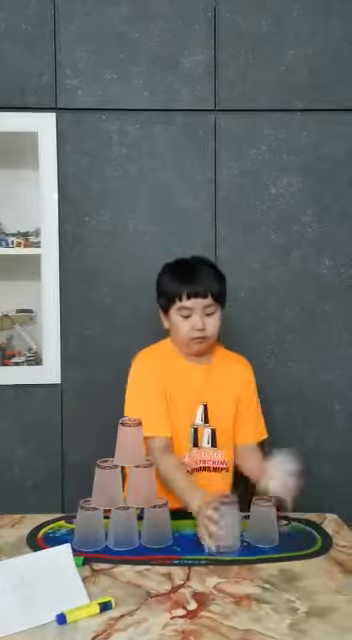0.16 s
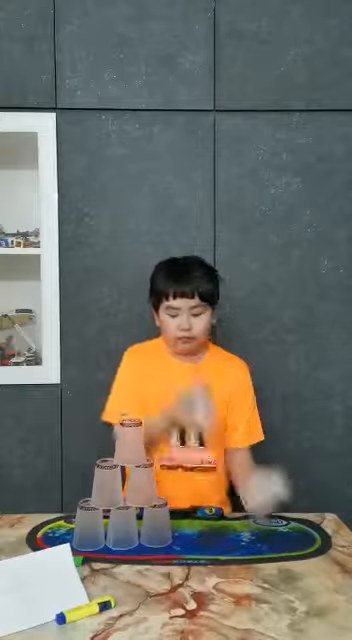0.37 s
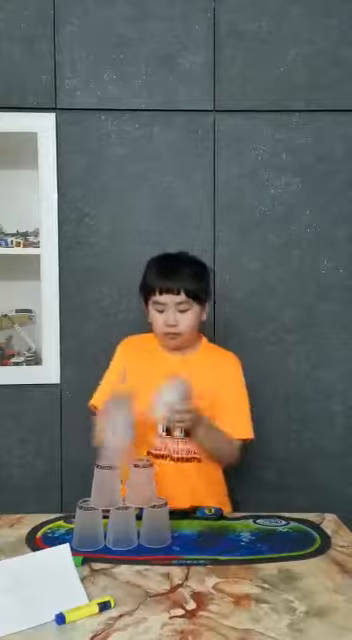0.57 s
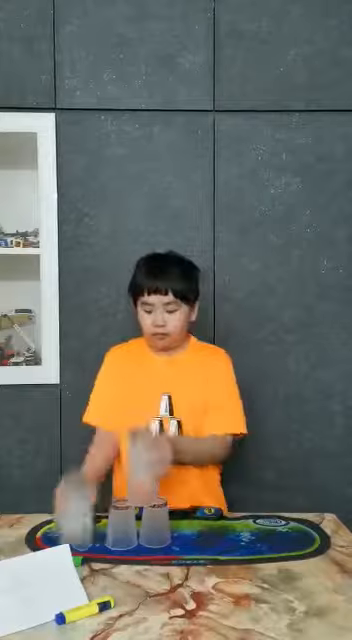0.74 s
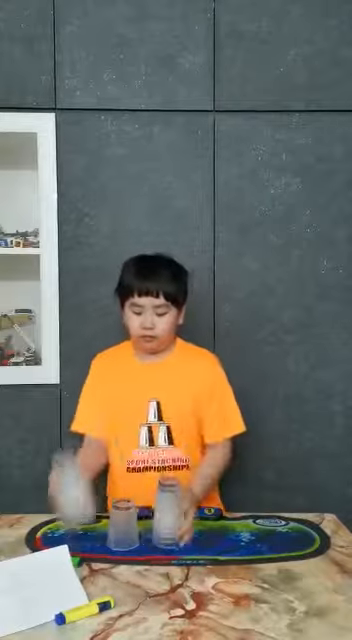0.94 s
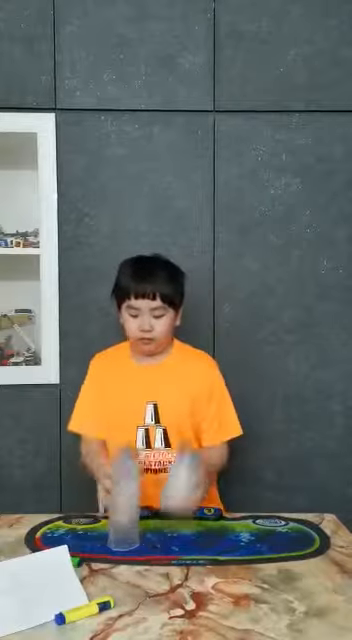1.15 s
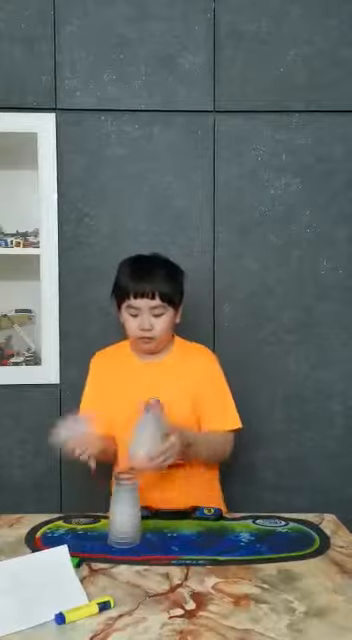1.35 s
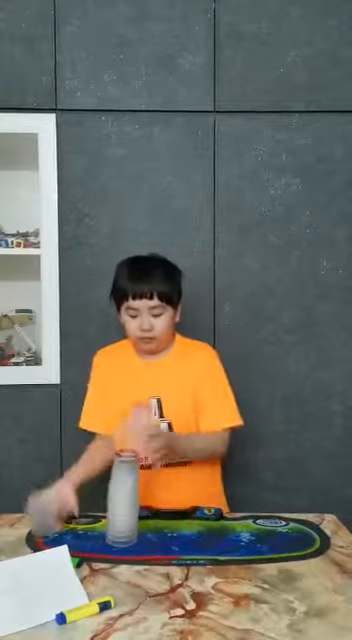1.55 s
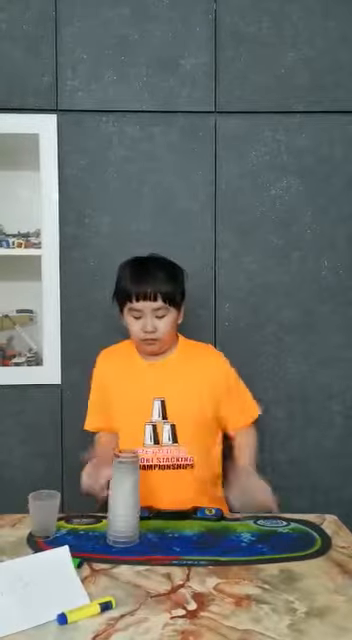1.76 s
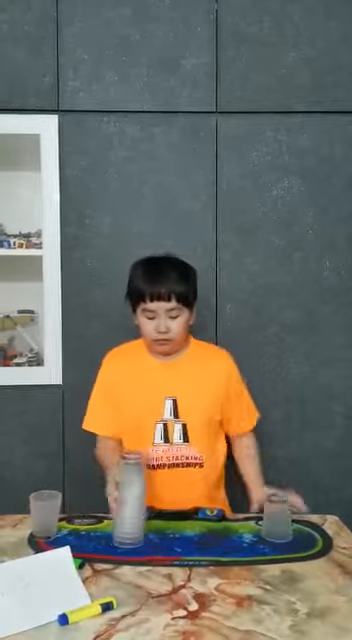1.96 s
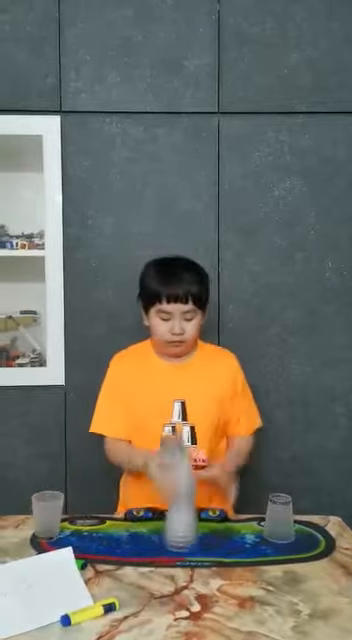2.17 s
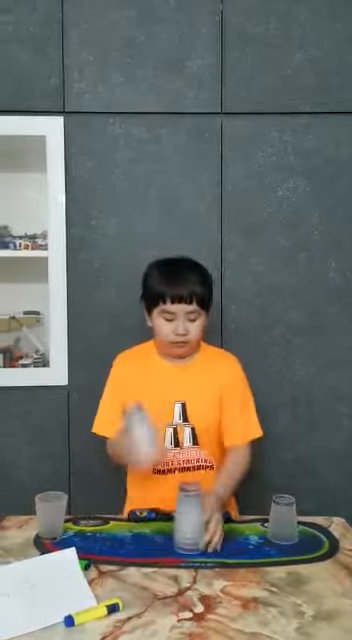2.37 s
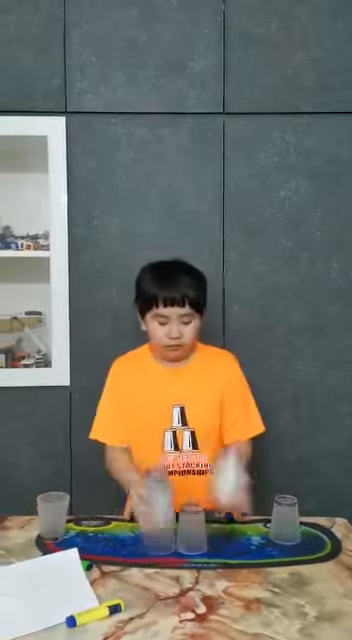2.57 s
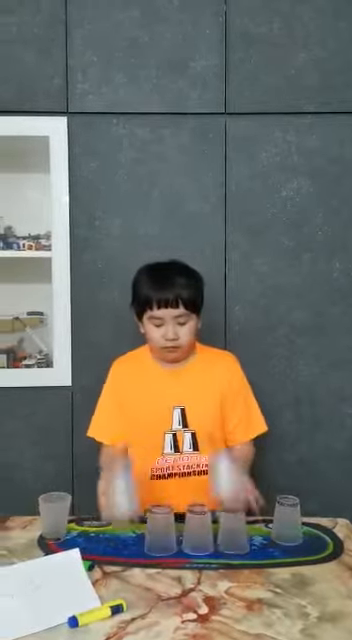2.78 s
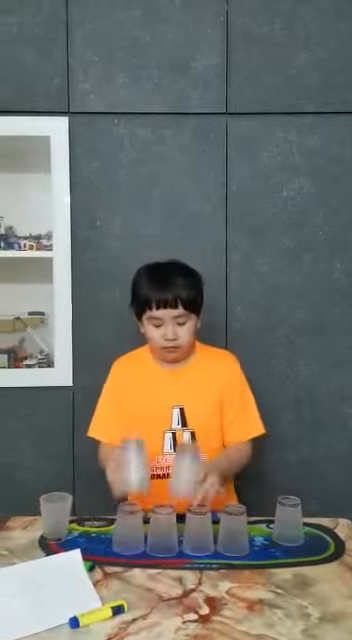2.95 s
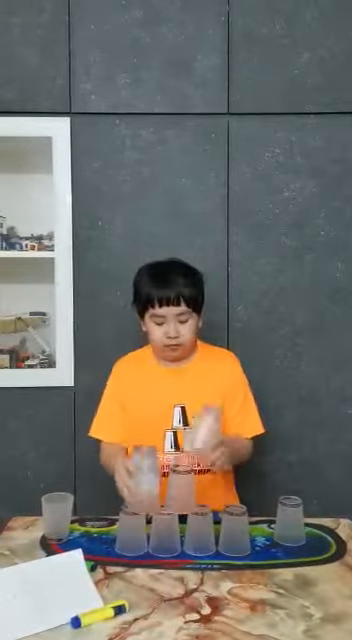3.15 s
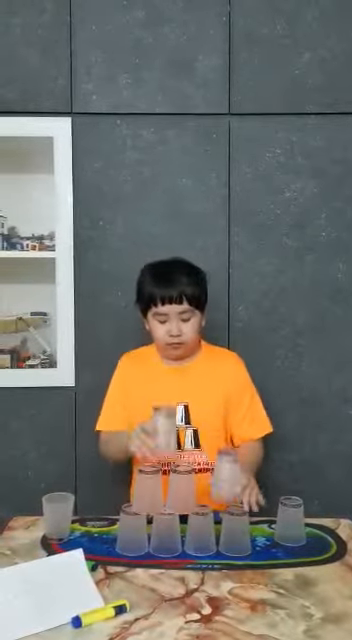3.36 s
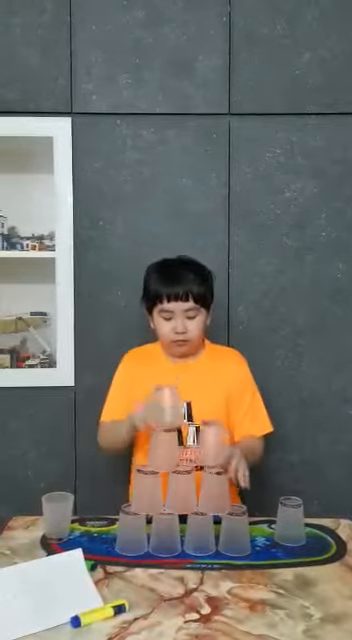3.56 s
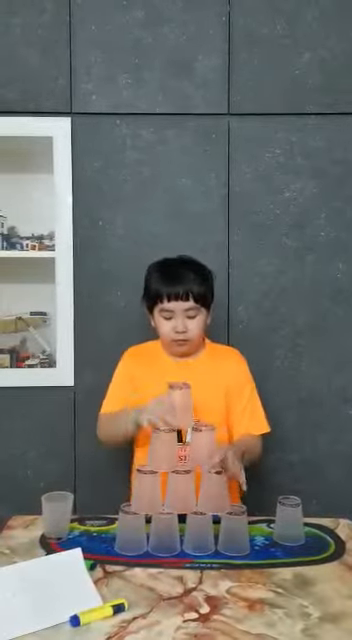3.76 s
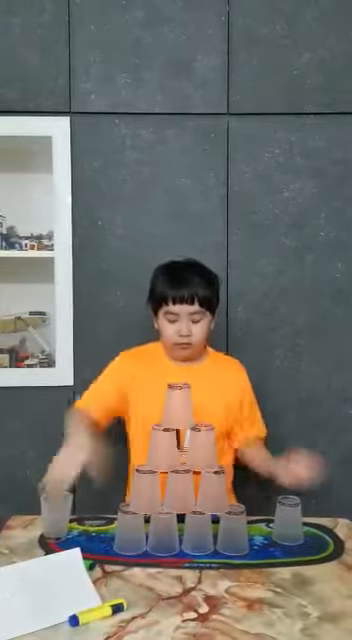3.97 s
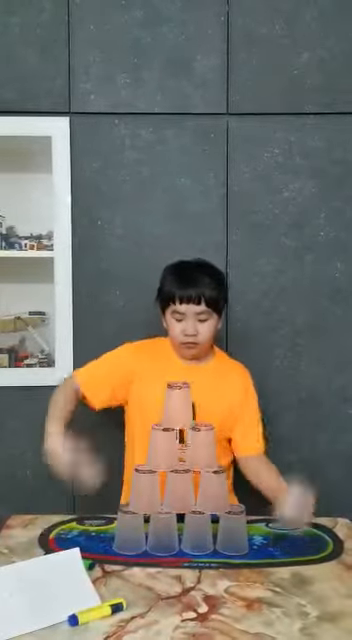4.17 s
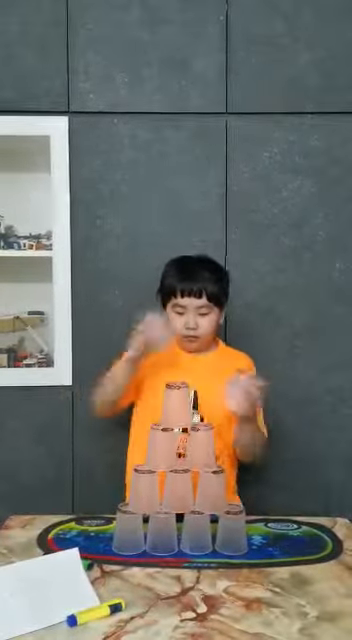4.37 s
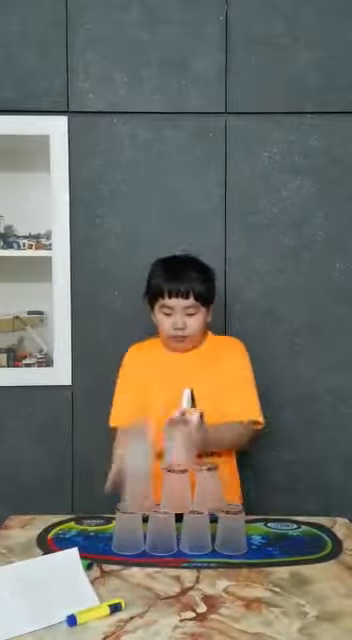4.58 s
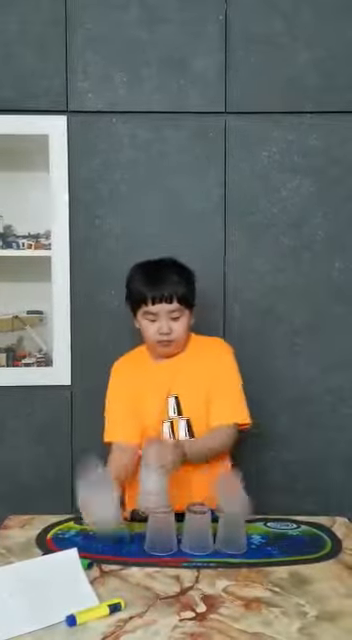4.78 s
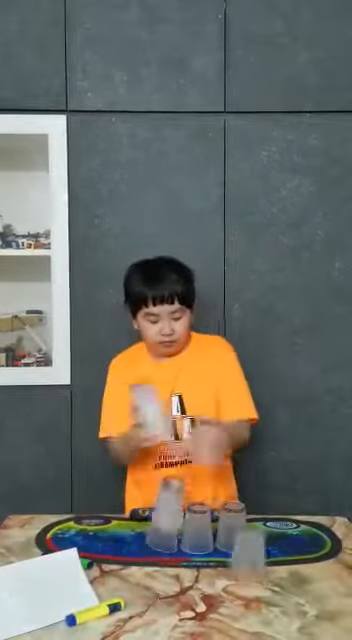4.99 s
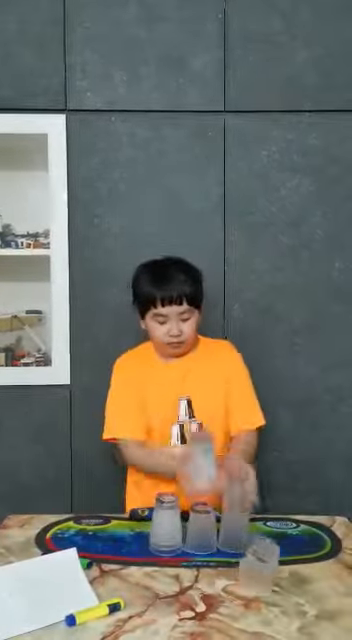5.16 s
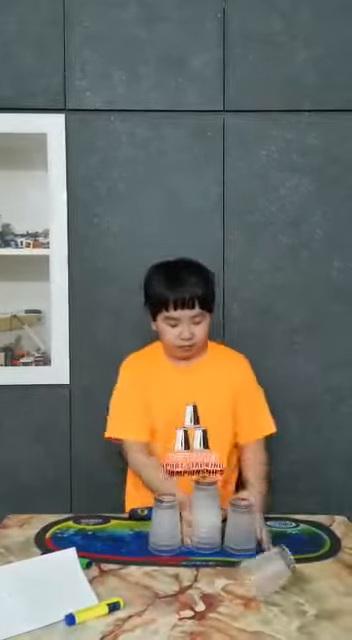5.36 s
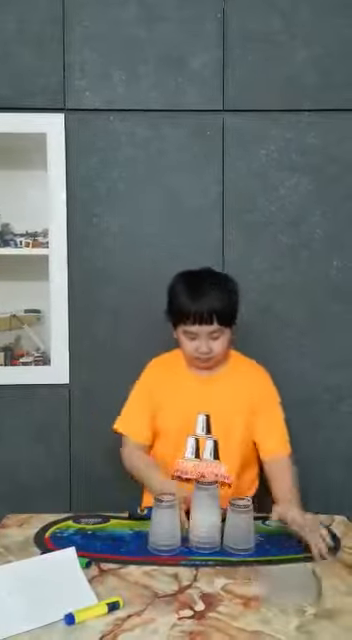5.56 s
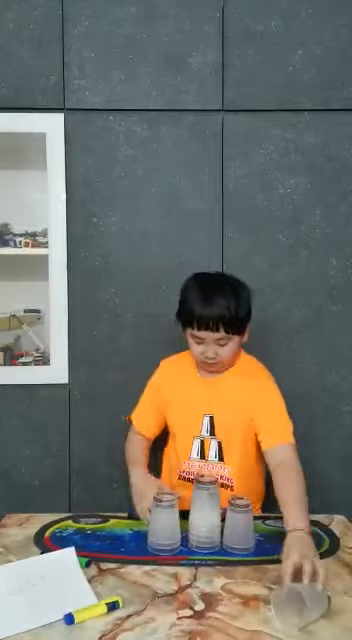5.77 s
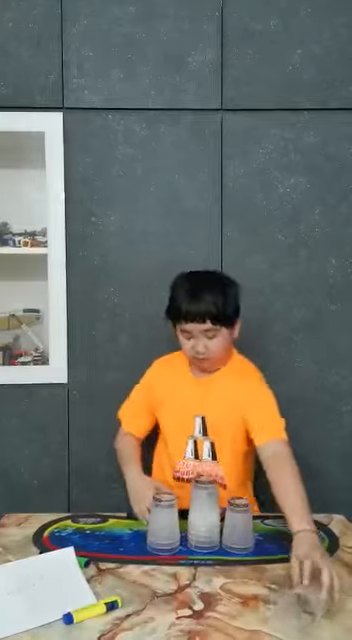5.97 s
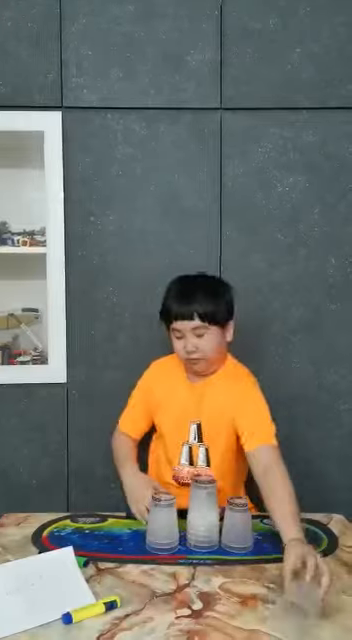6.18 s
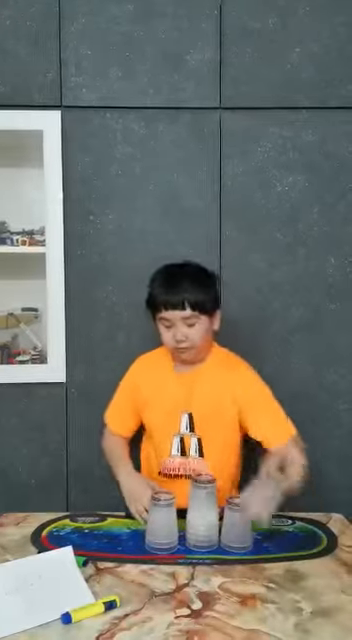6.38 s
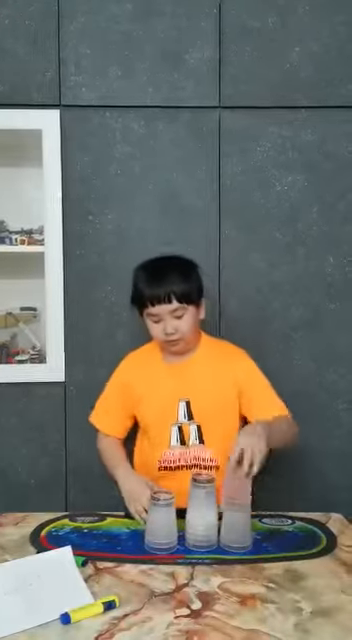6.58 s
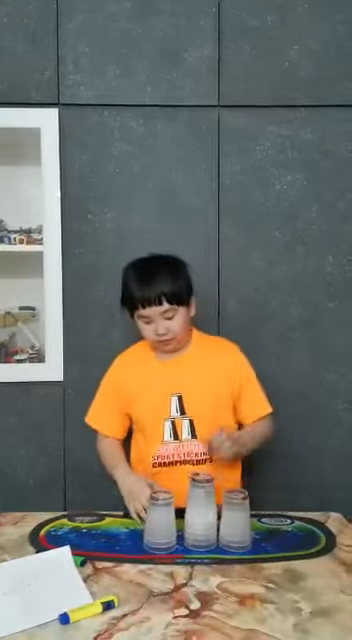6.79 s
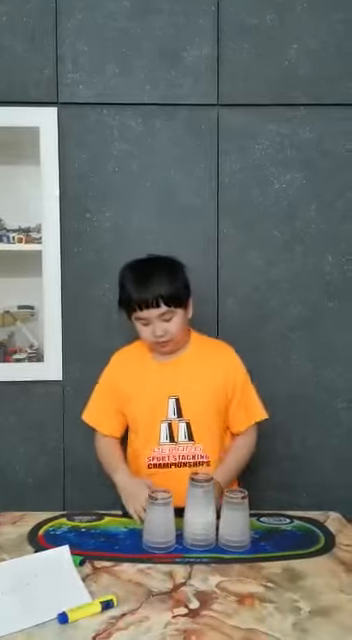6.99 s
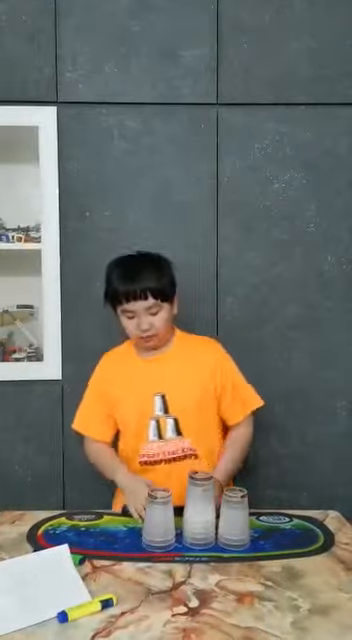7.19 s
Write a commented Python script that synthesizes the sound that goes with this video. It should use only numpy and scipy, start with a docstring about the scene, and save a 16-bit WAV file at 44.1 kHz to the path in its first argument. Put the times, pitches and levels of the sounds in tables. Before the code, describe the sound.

Quick hollow clacks and short rasps of plastic cups being stacked and nested in a small room, ending in a few light taps.

```python
"""In a small, hard-walled room, plastic cups are stacked into pyramids on a table mat and swept down again.
Each impact excites damped modes: the table thumps, the air in the cup resonates, the wall rings and the
rim ticks. Nesting cups rasp by stick-slip friction. One cup tumbles onto the bare table and is put back
with two taps. A phone with two ports stands in front and hears it all over the low rush of the room."""
import sys
import numpy as np
from scipy import signal
from scipy.fft import rfft, irfft, next_fast_len
from scipy.io import wavfile

SR = 44100
rng = np.random.default_rng(int(sys.argv[2]) if len(sys.argv) > 2 else 0)


def digitize_waveform(pressure):
    """Quantize a signal to 16-bit integers and store it at the path in sys.argv[1].

    Rows of a 2-D input are taken as channels; values are limited to [-1, 1].
    """
    field = np.atleast_2d(pressure).T
    bounded = np.clip(field, -1, 1)
    quanta = np.round(bounded * 32767).astype(np.int16)
    wavfile.write(sys.argv[1], SR, quanta)


N = 318843
RING_T = np.arange(4096) / SR  # time axis of one impact, in seconds
WALL_HZ, LIP_HZ = 1156, 2012  # usual pitches; grip and nested cups shift them from blow to blow

# Blows: start_s, level_db, hardness_db, hollow_hz, then wall_hz and lip_hz where given
LANDINGS = [(.131, -31, -6, 450, 1110), (.147, -45, -11, 433, 1120), (.191, -30.5, -1.5, 441, 1320),
            (.374, -31.5, -11, 602, 866), (.739, -32, -0.5, 457, 1100), (.913, -32, -3, 412, 960),
            (1.018, -30, -2, 537, 1286), (1.674, -30, -8, 459, 967), (1.941, -29, -19.5, 533, 1230),
            (1.975, -34, -10, 457, 1190), (2.281, -53.5, 6, 524, 1280), (2.563, -40.5, -40, 514, 1240),
            (2.658, -20, -18, 637, 1000), (2.797, -20.5, -17.5, 574, 1060), (2.822, -33, -12.5, 386, 1010),
            (2.967, -22, -12.5, 626, 1073), (2.995, -27, -18.5, 512, 1010), (4.193, -40, -27, 550, 1270),
            (4.85, -33.5, -5, 707, 1270), (4.917, -32.5, -8.5, 576, 940), (5.067, -38, -22, 444, 1240),
            (7.1, -55, -9, 302, 1250)]  # a cup or stack lands on the mat
TIERS = [(3.112, -20, -6, 630, 1205, 1670), (3.241, -22.5, -5.5, 606, 1100, 1770),
         (3.53, -22.5, 0, 526, 997, 1700)]  # a cup is set on the tier below
CROWNS = [(.001, -38.5, 0.5, 617, 1250), (.665, -43, 4.5, 620, 1120), (.705, -38, 0, 650, 1120),
          (3.762, -29, -4.5, 584, 1406), (3.859, -28, 0.5, 630, 1287), (4.58, -51.5, 11, 530, 1280),
          (4.588, -31, 6, 537, 1180), (4.71, -29, 0, 645, 1120)]  # the top cup of a pyramid is set or grabbed
NESTS = [(.088, -41.5, -9, 537, 1320), (.111, -32.5, 3.5, 490, 1220), (.3, -31, -1, 686, 740),
         (.361, -40, 11.5, 580, 1260), (.694, -27.5, -16, 693, 1170), (.8206, -29.5, -0.5, 520, 1070),
         (.88, -28.5, 2, 580, 1196), (.985, -35.5, -0.5, 437, 1230), (1.327, -28.5, 1.5, 520, 1190),
         (1.386, -49, 8, 470, 1240), (1.415, -59, 12, 470, 1270), (1.523, -34.5, 2.5, 490, 880),
         (1.636, -30.5, 1, 570, 1150), (4.631, -27.5, -2, 630, 1300), (4.744, -43, -8, 550, 1190),
         (4.7515, -30.5, 4.5, 565, 1150), (4.88, -44, 6, 527, 1220), (5.086, -31, 1.5, 510, 1335),
         (5.1335, -26, -3.5, 724, 1390), (5.193, -41.5, 8, 627, 1230), (5.389, -31.5, 2, 630, 1124)]  # a cup drops over another; the rows at 5.086 s and 5.1335 s add body to the stray cup's first bounces on the table
RIM_HITS = [(4.639, -36, 1, 690, 1290, 2070), (4.655, -31.5, -6, 700, 1180, 2370),
            (4.665, -27.5, 1, 660, 1080, 2230), (4.679, -45, 6, 614, 1170, 2050)]  # rim strikes rim in the falling pyramid
GRAZES = [(.036, -43, 0, 500), (.05, -44, 2, 530), (.06, -47, 6, 510), (.083, -43, -1.5, 500),
          (.117, -39, -1, 500), (.143, -47.5, 6.5, 500), (.342, -42.5, 0.5, 517), (.687, -53, 6.5, 515),
          (2.554, -68, -2.5, 506), (2.8675, -58, 3, 483), (2.94, -57.5, -1, 438), (4.283, -62, 2.5, 390),
          (4.363, -56.5, -9, 550), (5.049, -40.5, -17, 460), (5.066, -55, 3, 483), (6.795, -62, 1.5, 533)]  # a rim grazes a cup in passing
TAPS = [(1.255, -25, 0, 546, 920, 1780), (5.31, -22, -0.5, 551, 970, 1850),
        (6.654, -28.5, -2, 510, 1195, 2500), (6.82, -28, 0.5, 578, 1293, 1530)]  # a cup is pushed home on its stack
# What each contact excites, relative to the blow: hollow_db, note_db, thump_db, wall_db, mouth_db,
# tick_db, lip_db, snap_db, treble_db_per_octave, chatter_db
ON_MAT = (-1.5, -11.5, -6, 4, -31, -3, -11, -6.5, -1, 4)
ON_TIER = (-4, 0, -16, -3.5, -13.5, -8.5, -7.5, -3.5, -3.5, -26)
AT_CROWN = (-1, 2.5, -13, -5, 5.5, -5, -42.5, -5, -2, -12)
IN_CUP = (-3.5, -28, -12.5, -0.5, -29.5, -3, -10, -6, -0.5, -11)
RIM_ON_RIM = (-5.5, 2.5, -23, -2.5, -25, -5, -2, -2, 1, -10)
GRAZING = (-1, -8, -12, -9, 3, 7, -38, 12, 5.5, -5)
ON_STACK = (-6, 2.5, -12, -2.5, -18, -11, -11.5, -9, 0.5, -15)

def stacking():
    """The point of contact sets how modes share a blow. Yields start, room sound and forward beam."""
    for blows, contact in ((LANDINGS, ON_MAT), (TIERS, ON_TIER), (CROWNS, AT_CROWN), (NESTS, IN_CUP),
                           (RIM_HITS, RIM_ON_RIM), (GRAZES, GRAZING), (TAPS, ON_STACK)):
        for start_s, *blow in blows:
            yield start_s, *knock(contact, *blow)

def knock(contact, level_db, hardness_db, hollow_hz, wall_hz=WALL_HZ, lip_hz=LIP_HZ):
    """Impact excitation: any blow drives cavity and table; harder ones put more into the shell."""
    hollow_db, note_db, thump_db, wall_db, mouth_db, tick_db, lip_db, snap_db, tilt, chatter_db = contact
    firm_db, sag = -32.5, 0.51  # the thump grows more slowly than the blow: dB lost per dB
    table_db = level_db + thump_db - sag * (level_db - firm_db)
    shell_db = level_db + hardness_db
    pop = strength(air_note(hollow_hz), level_db + note_db)
    body = strength(thump(), table_db)
    body += strength(hollow(hollow_hz), level_db + hollow_db) + undb(-17) * pop
    body += thud(table_db - 12.5)
    body += strength(wall(wall_hz), shell_db + wall_db)
    body += strength(tick(tilt, chatter_s=0.0032, chatter_db=chatter_db), shell_db + tick_db)
    body += strength(mouth(), shell_db + mouth_db)
    body += strength(lip(lip_hz), shell_db + lip_db - 2.5)  # the lip radiates mostly forwards
    clack = np.array([strength(wall(wall_hz), wall_db) + strength(lip(lip_hz), lip_db) for _ in range(2)])
    return body, pop + undb(shell_db - 0.5) * clack + snap(shell_db + snap_db)

# Air in the cup and the mat under it: pitch_ratio, level_db, t60_s
HOLLOW_MODES = [(.68, -3.5, 0.009), (.84, -4, 0.018), (1.0, -13, 0.035), (1.11, -3.5, 0.016),
                (1.38, 1, 0.0088)]

def hollow(pitch_hz):
    """Cavity resonance: the enclosed air sounds a cluster of short-lived modes."""
    modes = ring(HOLLOW_MODES, pitch_hz, scatter_db=2, detune=0.024)
    return cut(swell(modes, rise_s=0.002), 290, "high")

def air_note(pitch_hz, t60_s=0.037):
    """Damped oscillator: the trapped air swells and dies on one clear pitch."""
    return swell(np.sin(2 * np.pi * pitch_hz * RING_T) * decay(RING_T, t60_s), rise_s=0.0076)

# Bending of the wall: pitch_ratio, level_db, t60_s
WALL_MODES = [(.78, -3, 0.016), (.9, -4.5, 0.018), (1.0, 0.5, 0.014), (1.12, -1, 0.014),
              (1.28, 5.5, 0.0077), (1.5, -6, 0.0067)]

def wall(pitch_hz):
    """Flexural vibration: the wall rings in a narrow band, a focused tock."""
    modes = swell(ring(WALL_MODES, pitch_hz, scatter_db=2.5), rise_s=0.00083)
    return cut(modes, 1.92 * pitch_hz, "low", order=5)

# The stiff lip: pitch_ratio, level_db, t60_s
LIP_MODES = [(.92, -2, 0.011), (1.0, 6, 0.0055), (1.12, -7, 0.008), (1.27, -7, 0.0055)]

def lip(pitch_hz=LIP_HZ):
    """Stiffness raises natural frequency: the lip clacks above the wall."""
    return swell(ring(LIP_MODES, pitch_hz), rise_s=0.00083)

# The open mouth: pitch_hz, level_db, t60_s
MOUTH_MODES = [(1180, -3, 0.072), (1220, 8.5, 0.063), (1370, 19.5, 0.02)]

def mouth():
    """Free-edge vibration: the mouth flexes with little damping, a hollow tock."""
    return swell(ring(MOUTH_MODES, detune=0.0077), rise_s=0.0004)

# Crack of plastic on plastic: frequency_hz, density_db
CRACK_SPECTRUM = [(300, -3.5), (1200, 0), (2300, -4), (3600, 1), (4700, 3), (5800, -4), (7000, -5),
                  (8200, -13), (9400, -13), (10200, -17), (13000, -23), (15500, -44)]
# High ring of the rim: pitch_hz, level_db, t60_s
RIM_MODES = [(1845, 1, 0.0091), (2534, 7.5, 0.0044), (3440, 7, 0.0066), (3940, 0, 0.0025),
             (4400, 12, 0.0012), (4300, 1.5, 0.0053), (7020, -7, 0.01)]

def tick(tilt, chatter_s=0.00099, chatter_db=-9):
    """A brief contact is broadband: the rim cracks, chatters, rings. Tilt is dB per octave above 5 kHz."""
    hz = freqs(RING_T)
    crack = impulse(along(CRACK_SPECTRUM, hz) + tilt * np.log2(np.maximum(hz / 5000, 1)))
    force = strength(noise_burst(chatter_s), chatter_db, 1 / SR)
    force[0] += 1  # the first strike
    chatter = signal.fftconvolve(force, crack)[:len(RING_T)]
    rim = swell(ring(RIM_MODES), rise_s=0.00068)
    return strength(chatter, 0) + strength(rim, -10)

# The struck patch of wall: pitch_hz, level_db, t60_s
SNAP_MODES = [(2770, -22, 0.0054), (3300, -23, 0.0028), (4530, 11.5, 0.0037), (5260, -6, 0.0092),
              (6830, -7.5, 0.0069)]

def snap(drive_db, firm_db=-20, growth=0.37):
    """Buckling is nonlinear: the snap grows faster than the blow. Each port lies in another lobe."""
    level_db = drive_db + growth * (drive_db - firm_db)
    lobes = [swell(ring(SNAP_MODES, detune=0.051), rise_s=0.0015) for _ in range(2)]
    return np.array([strength(lobe, level_db) for lobe in lobes])

# Table under the mat: pitch_hz, level_db, t60_s
TABLE_MODES = [(126.8, -7, 0.37), (158.7, 6, 0.1), (203.1, -9.5, 0.74), (252.4, 12, 0.028),
               (294.4, 0.5, 0.14), (401.4, -1, 0.045), (446, -1.5, 0.14)]

def thump():
    """Plate vibration: the blow passes through the mat and rings the table."""
    return cut(swell(ring(TABLE_MODES, detune=0.015), rise_s=0.0014), 146, "high")

# The whole table top: pitch_hz, level_db, t60_s
HEAVE_MODES = [(67.7, -11.5, 0.13), (115.7, -3, 0.024)]

def thud(level_db):
    """A slow contact drives the lowest modes: the whole table top heaves."""
    heave = swell(ring(HEAVE_MODES), rise_s=0.006)
    return strength(cut(heave, 116.5, "high", order=4), level_db)

# Stacks set down hard: start_s, level_db
THUDS = [(.116, -37), (0.172, -34.5), (0.358, -40.5), (.872, -36), (1.012, -45.5), (1.315, -37),
         (2.791, -35.5), (5.377, -36)]

def stack_thuds():
    """Momentum transfer: each heavy stack sets the table top moving."""
    return [(start_s, thud(level_db)) for start_s, level_db in THUDS]

# A stray cup hits the bare table: start_s, ring_db, ping_db
BOUNCES = [(5.086, -36.5, -37), (5.133, -34.5, -44), (5.603, -35, -36), (5.71, -40.5, -41),
           (5.78, -41.5, -41), (5.806, -40, -37.5), (5.911, -76, -52), (5.986, -81, -60)]
# Its hollow, with no hand to damp it: pitch_hz, level_db, t60_s
FREE_MODES = [(358, -0.5, 0.059), (416, 1, 0.026), (477, -4, 0.21)]
# Dry clack of its shell: frequency_hz, density_db
CLACK_SPECTRUM = [(300, -21), (700, -16), (1000, -1.5), (1250, 3.5), (1600, -11.5), (2050, -6), (2800, -21),
                  (3450, -16), (4100, -31), (9000, -55)]
# Its rim on the hard top: pitch_hz, level_db, t60_s
PING_MODES = [(4830, 0, 0.0052), (5600, 4, 0.0035), (6730, 2, 0.0043), (9000, 6, 0.0015)]

def stray_cup():
    """Free vibration: a loose cup rings freely at each bounce. Yields start, body and rim ping."""
    shell = impulse(along(CLACK_SPECTRUM, freqs(RING_T)))
    for start_s, ring_db, ping_db in BOUNCES:
        cavity = swell(ring(FREE_MODES, scatter_db=0, detune=0.0072), rise_s=0.0018)
        rattle = swell(noise_burst(0.009), rise_s=0.00034)
        clack = signal.fftconvolve(rattle, shell)[:len(RING_T)]
        ping = swell(ring(PING_MODES), rise_s=0.00047)
        chatter = tick(tilt=7.5, chatter_s=0.0026, chatter_db=-27)
        body = strength(cavity, ring_db - 5) + strength(clack, ring_db) + strength(lip(), ring_db - 14)
        yield start_s, body + strength(chatter, ping_db - 4), strength(ping, ping_db)

# Cups slide on cups, mat or table: start_s, end_s, body_db, hiss_db, brightness_db
SLIDES = [(0.047, 0.16, -51, -41, 2), (0.34, 0.36, -41, -38, 11), (0.674, 0.76, -74, -49.5, 0),
          (0.962, 1.019, -42, -61, -8), (1.34, 1.493, -40.5, -57, -8), (2.055, 2.27, -69.5, -70, 13),
          (2.242, 2.286, -96, -55, 8), (2.357, 2.478, -65, -71.5, 11), (2.519, 2.588, -84, -58, 16),
          (2.662, 2.73, -40.5, -51, -2), (2.805, 2.838, -37, -66, -7), (2.973, 3.03, -40.5, -56, 7),
          (3.559, 3.618, -34.5, -48.5, 3), (4.146, 4.244, -57, -57.5, 7.5), (4.382, 4.516, -69, -68.5, 10),
          (4.595, 4.67, -49, -40.5, 8), (4.725, 4.785, -50, -45, 3), (4.794, 4.912, -43, -50, 5),
          (5.047, 5.066, -42.5, -47.5, 5), (5.165, 5.24, -41.5, -48, 0), (5.277, 5.299, -50, -46, 9),
          (5.371, 5.398, -42, -41, 12), (5.432, 5.5, -46, -55, -20), (5.785, 5.849, -56, -55.5, 23),
          (5.917, 5.98, -84, -59, 23), (6.036, 6.128, -72, -70.5, 6), (6.803, 6.834, -68, -49, 6),
          (7.073, 7.099, -81, -55, -5)]
# Ribs scraping along a wall: pitch_hz, level_db, t60_s
SCRAPE_MODES = [(3190, -21.5, 0.0031), (4165, -9, 0.0023), (5100, -13, 0.0021)]

def slides(contacts=4, firm_db=-50, bite=0.68):
    """Friction excitation: each point of contact rings the cup its own way; firm slides scrape more."""
    for start_s, end_s, body_db, hiss_db, bright_db in SLIDES:
        seconds = end_s - start_s
        layers = 0
        for _ in range(contacts):
            cup = strength(ring(HOLLOW_MODES, 560, detune=0.014), 0) + strength(wall(1230), -1.2)
            cup += strength(ring(TABLE_MODES), -7)
            rim = tick(tilt=1)
            ribs = swell(ring(SCRAPE_MODES, detune=0.058), rise_s=0.00058)
            force = stick_slip(int(seconds * SR))
            layers += signal.fftconvolve(force[None], np.array([cup, rim, ribs]), axes=1)
        body, hiss, scrape = layers
        body = strength(cut(body, 226, "high"), body_db, seconds)
        hiss = colour(hiss, [(3000, 0), (6000, bright_db), (9000, bright_db), (13000, 0)])
        scrape_db = hiss_db - 3 + bite * (hiss_db - firm_db)
        yield start_s, body + strength(hiss, hiss_db, seconds) + strength(scrape, scrape_db, seconds)

def stick_slip(size, catches_per_s=130, spread_db=5, smooth_drag=0.011):
    """Stick-slip force: plastic catches and lets go in tiny uneven steps."""
    catches = rng.random(size) < catches_per_s / SR
    steps = catches * undb(spread_db * rng.exponential(size=size).clip(0, 3))
    return (steps + smooth_drag) * rng.standard_normal(size) * signal.windows.tukey(size, 0.4)

# First echoes from ceiling and walls: delay_s, left_db, right_db
ECHOES = [(.0021, -28, -10.5), (.0078, -3, 2), (0.0099, 0, -16.5), (0.013, 0, -24)]
# Reverberation by band: centre_hz, t60_s, reverberant_to_direct_db
REVERB_BANDS = [(95, 0.82, 2), (244, 0.41, 13.5), (660, 0.32, 11.5), (1220, 0.38, 3.5), (2890, 0.33, 7.5),
                (4680, 0.3, 1), (7300, 0.31, 6), (13000, 0.22, 9)]

def room_response(size=24576, build_s=0.0019, left_lag_s=0.00013, wander_s=0.00037):
    """Impulse response from one spot on the table: direct sound, early reflections, a dense tail."""
    t = np.arange(size) / SR
    noise, tail = rfft(diffuse(size)), 0
    centres_hz = np.array(REVERB_BANDS)[:, 0]
    for (_, t60_s, level_db), weights in zip(REVERB_BANDS, np.eye(len(centres_hz))):
        band = along(list(zip(centres_hz, weights)), freqs(t))
        fade = decay(t, t60_s) * (1 - np.exp(-t / build_s))
        tail += irfft(noise * band) * strength(fade, level_db, 1 / SR)
    early = np.zeros((2, size))
    for delay_s, left_db, right_db in ECHOES:
        arrival_s = abs(delay_s + wander_s * rng.standard_normal())
        early[:, int(arrival_s * SR)] += undb([left_db, right_db])
    # The echoes are dull, but for a small share that keeps its treble.
    response = tail + cut(early, 910, "low", order=3) + undb(-9.5) * early
    response[0, int(left_lag_s * SR)] += 1
    response[1, 0] += 1
    return response

# Background of the room: frequency_hz, density_db
AIR_SPECTRUM = [(15, -26), (25, -6.5), (154, -7), (301, -6), (404, -14), (673, -15.5), (1210, -18),
                (1390, -18), (1810, -25), (4620, -29.5), (8100, -38), (12100, -44), (15000, -47)]

def room_air(level_db=-57):
    """Ambient noise: a low, steady rush from all sides."""
    rush = colour(diffuse(next_fast_len(N)), AIR_SPECTRUM)[:, :N]
    return strength(rush, level_db, 2 * N / SR)

def diffuse(size, spacing_s=0.0005):
    """Diffuse-field coherence: noise at two ports is alike in the bass, unrelated in the treble."""
    noise = rng.standard_normal((2, size))
    coherence = np.sinc(2 * spacing_s * freqs(noise))
    mid, side = irfft(rfft(noise) * np.sqrt([1 + coherence, 1 - coherence]), size)
    return np.array([mid + side, mid - side]) / np.sqrt(2)

def ring(modes, pitch=1, scatter_db=3, detune=0.032):
    """Modal superposition; grip and point of contact vary the shares and pitches on every blow."""
    hz, level_db, t60_s = np.transpose(modes)[:, :, None]
    share, shift, side = rng.standard_normal((3, len(modes), 1))
    waves = np.sin(2 * np.pi * hz * pitch * (1 + detune * shift) * RING_T) * decay(RING_T, t60_s)
    return np.sum(np.sign(side) * undb(level_db + scatter_db * share) * waves, axis=0)

def swell(x, rise_s):
    """Finite contact time: vibration builds up gradually."""
    return x * (1 - np.exp(-(RING_T / rise_s) ** 2))

def decay(t, t60_s):
    """Exponential damping: 60 dB lost in t60_s."""
    return np.exp(-np.log(1000) * t / t60_s)

def noise_burst(decay_s):
    """The random, dying force of a chattering contact."""
    return rng.standard_normal(len(RING_T)) * np.exp(-RING_T / decay_s)

def impulse(spectrum_db):
    """Minimum phase: the most abrupt click that has this spectrum."""
    cepstrum = irfft(np.log(undb(spectrum_db)))
    half = len(cepstrum) // 2
    cepstrum[1:half] *= 2
    cepstrum[half + 1:] = 0
    return irfft(np.exp(rfft(cepstrum)))

def undb(db):
    """Decibels to gain."""
    return 10 ** (np.asarray(db) / 20)

def strength(x, level_db, seconds=0.01):
    """Scale x to the energy of a sound of that level and length."""
    return x * undb(level_db) * np.sqrt(seconds * SR / np.sum(x ** 2))

def freqs(x):
    """Frequencies of the spectrum of x."""
    return np.fft.rfftfreq(x.shape[-1], 1 / SR)

def along(points, hz):
    """Interpolate (Hz, value) points on a log-frequency axis."""
    points = np.array(points)
    return np.interp(np.log(hz + 1), np.log(points[:, 0]), points[:, 1])

def colour(x, points):
    """Filter x by a curve of (Hz, dB) points."""
    return irfft(rfft(x) * undb(along(points, freqs(x))), x.shape[-1])

def cut(x, hz, kind, order=2):
    """Low-pass or high-pass."""
    return signal.sosfilt(signal.butter(order, hz, kind, fs=SR, output="sos"), x)

def balance(difference_db):
    """Left and right gains that differ by this level."""
    return undb(difference_db * np.array([[1], [-1]]) / 2)

def add(out, x, start_s):
    """Mix x into out from start_s."""
    i = int(start_s * SR)
    out[:, i:i + x.shape[1]] += x[:, :max(N - i, 0)]

# Where the hands work: time_s, left_minus_right_db
HAND_PATH = [(0, -3), (.75, -3), (1.5, -2), (2.3, -4), (3.3, -1.5), (4.3, -3.5), (4.65, 1.5), (5.05, 0),
             (5.2, 2.5), (5.45, 2.5), (5.6, 2), (7.1, -1)]

def scene(spots=7):
    """Superposition: forward beams arrive directly; the rest is panned and passes through the room."""
    responses = [room_response() for _ in range(spots)]
    out = room_air()
    into_room = []
    for start_s, body, beam in stacking():
        into_room.append((start_s, body))
        add(out, beam, start_s)
    for start_s, body, ping in stray_cup():
        into_room.append((start_s, body + undb(-7) * ping))
        add(out, ping[None], start_s)
    into_room += [*stack_thuds(), *slides()]
    for k, (start_s, sound) in enumerate(into_room):
        pan_db = np.interp(start_s, *np.transpose(HAND_PATH))
        heard = signal.fftconvolve(sound[None], responses[k % spots], axes=1)
        add(out, heard * balance(pan_db), start_s)
    return out

# Difference between the phone's ports: frequency_hz, left_minus_right_db
PORT_BALANCE = [(150, 1.5), (300, 3), (430, -3.5), (620, 8), (800, 2.5), (1300, -3.5), (2100, 0.5),
                (3600, -2), (4100, 1), (4700, -6.5), (5600, 1), (7000, -1.5), (9300, 11), (10500, 0)]

def record(dry, bass_hz=52, top_hz=15800):
    """Frequency response: each port has its own colour; the phone cuts the deepest bass and the top."""
    padded = np.pad(dry, ((0, 0), (0, next_fast_len(N + len(RING_T)) - N)))
    ports = balance(along(PORT_BALANCE, freqs(padded)))
    coloured = irfft(rfft(padded) * ports, padded.shape[1])[:, :N]
    heard = cut(coloured, bass_hz, "high")
    return signal.sosfilt(signal.ellip(8, 0.2, 70, top_hz, fs=SR, output="sos"), heard)

dry = scene()
out = record(dry)
digitize_waveform(out)
```